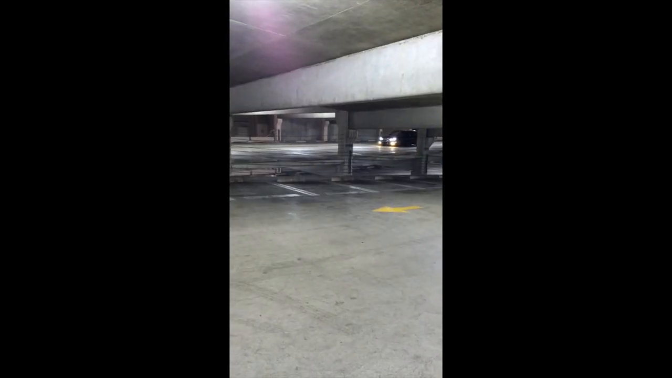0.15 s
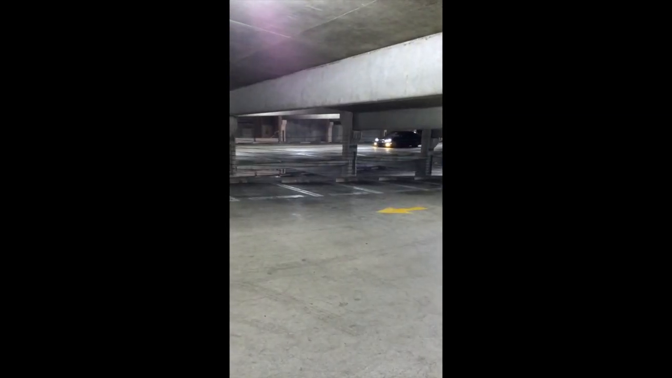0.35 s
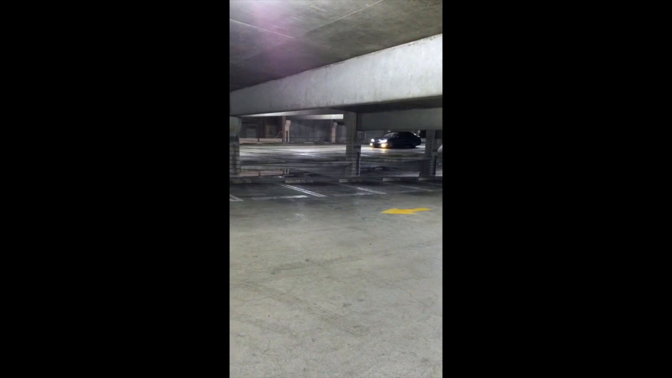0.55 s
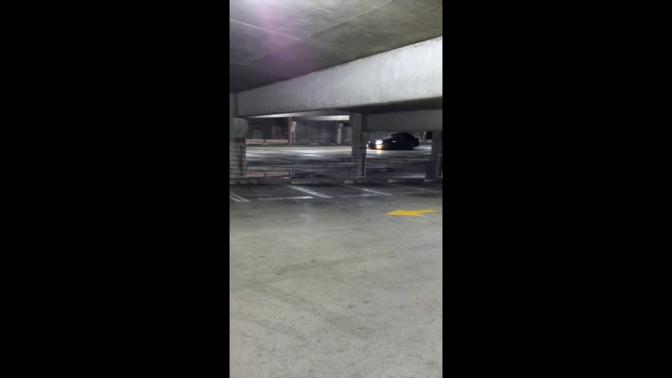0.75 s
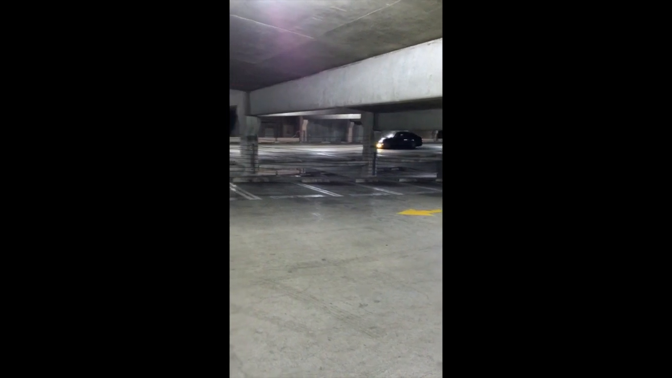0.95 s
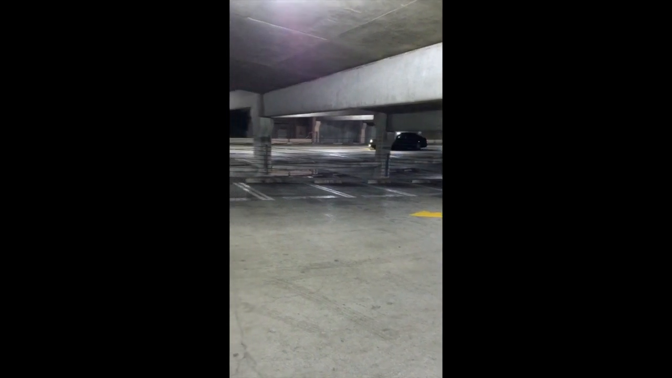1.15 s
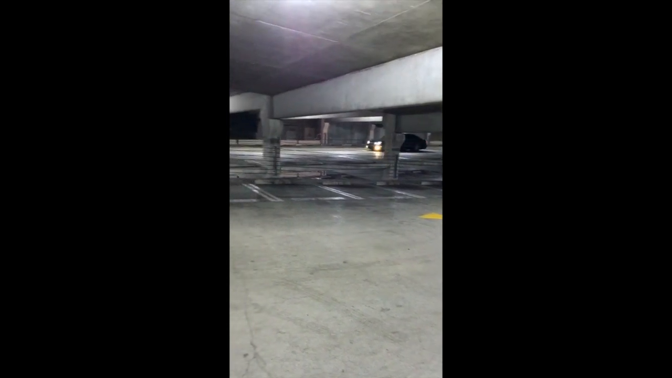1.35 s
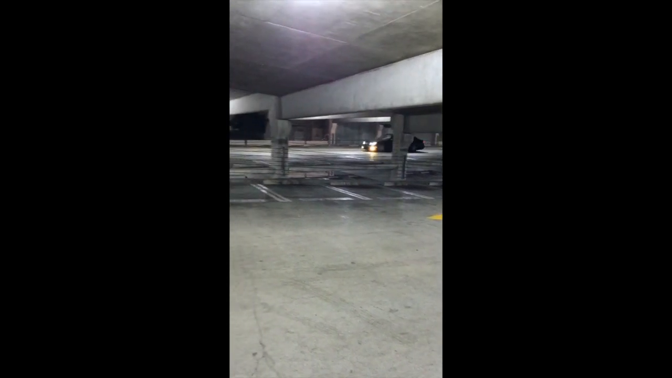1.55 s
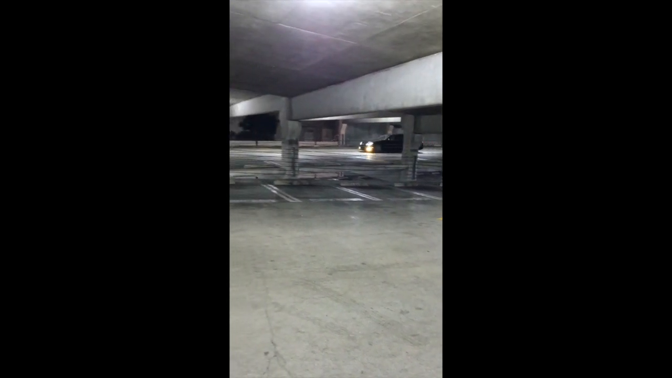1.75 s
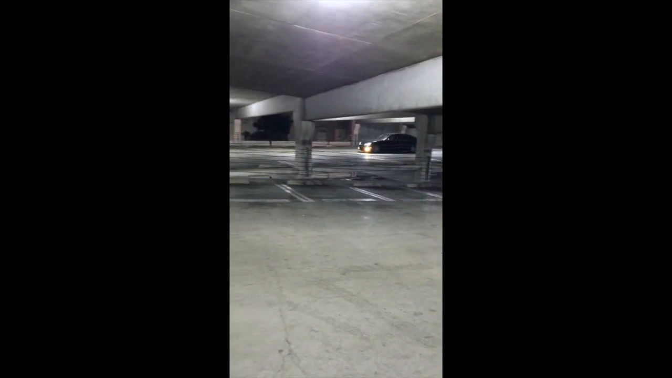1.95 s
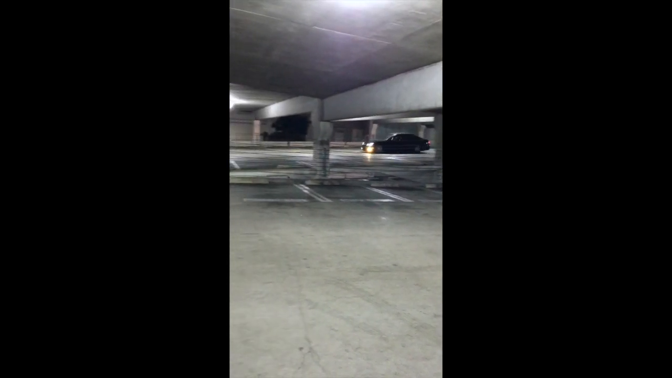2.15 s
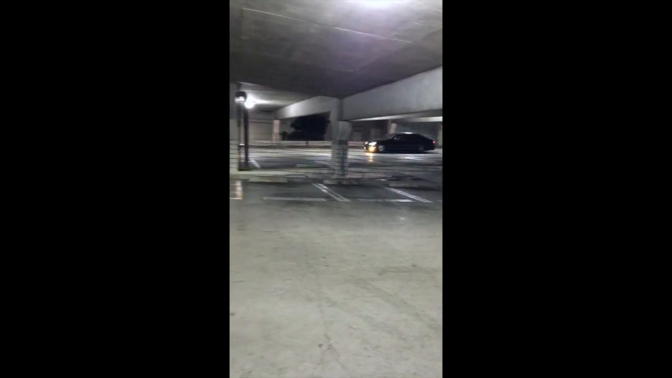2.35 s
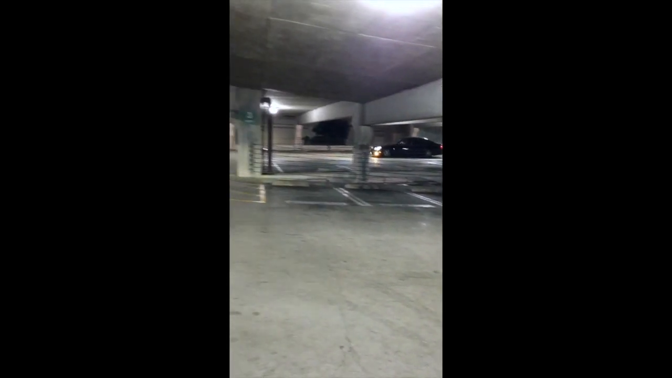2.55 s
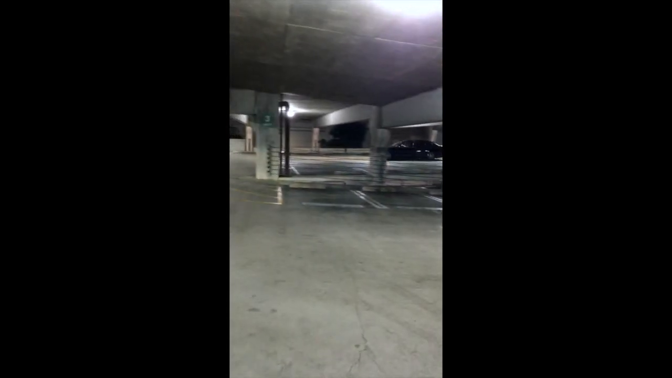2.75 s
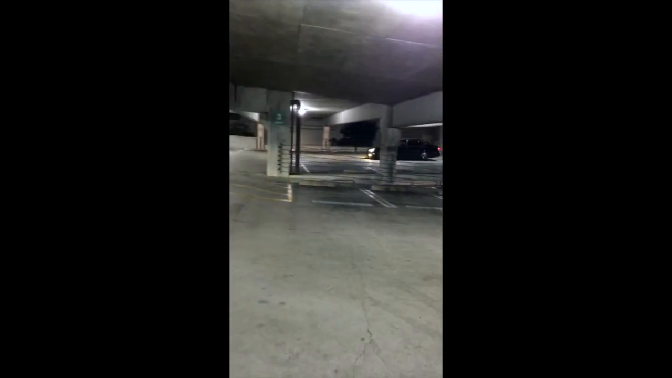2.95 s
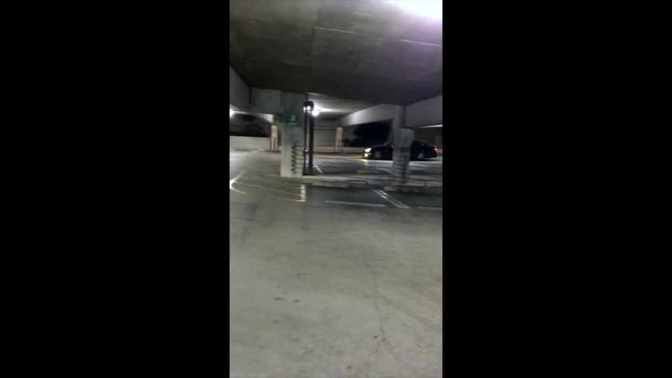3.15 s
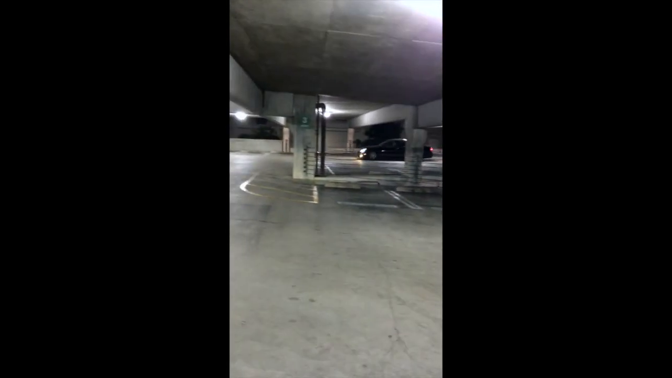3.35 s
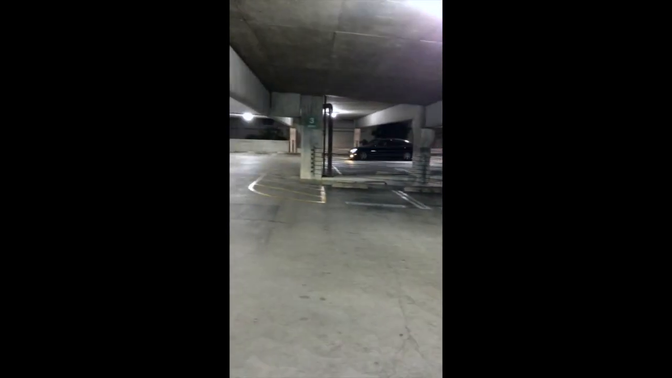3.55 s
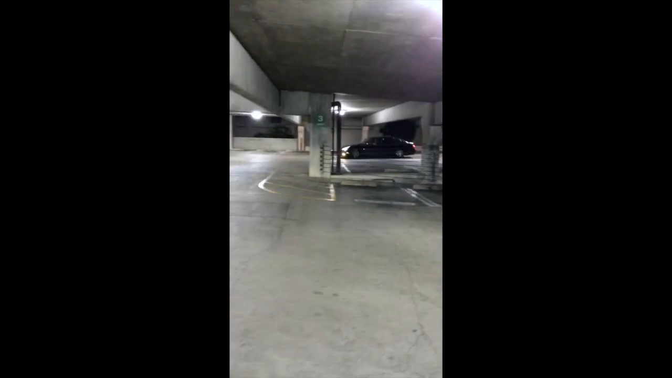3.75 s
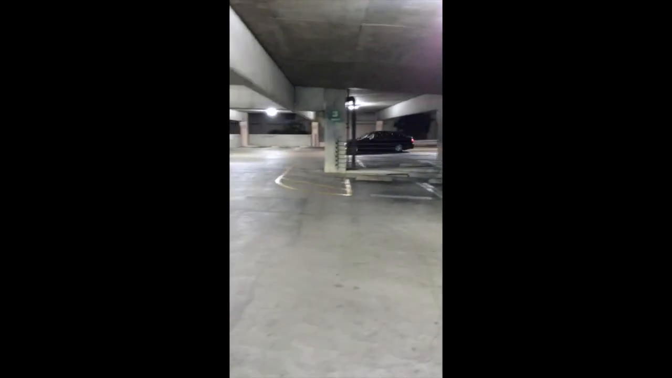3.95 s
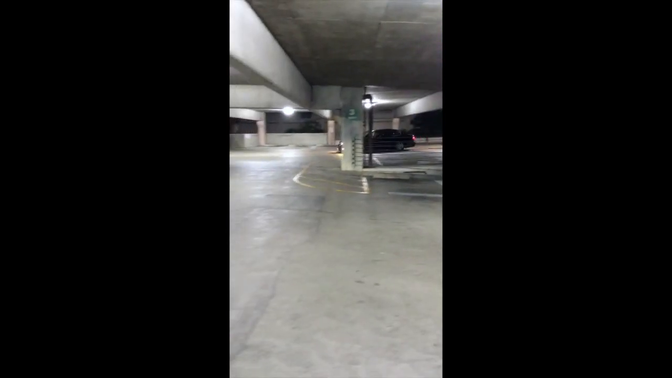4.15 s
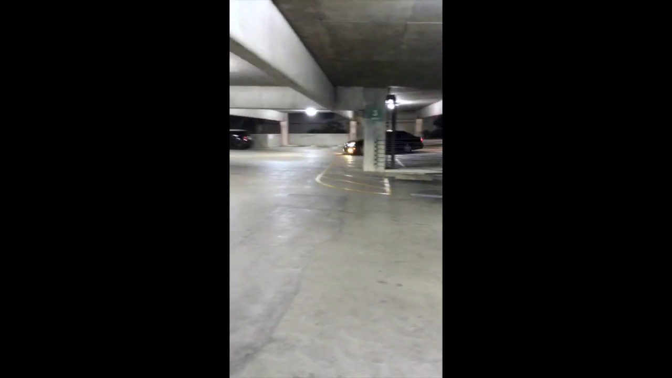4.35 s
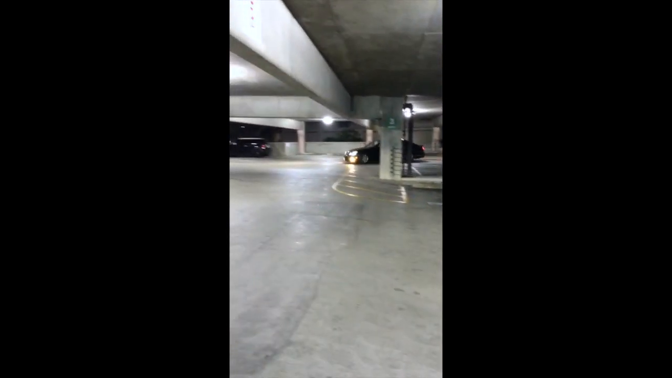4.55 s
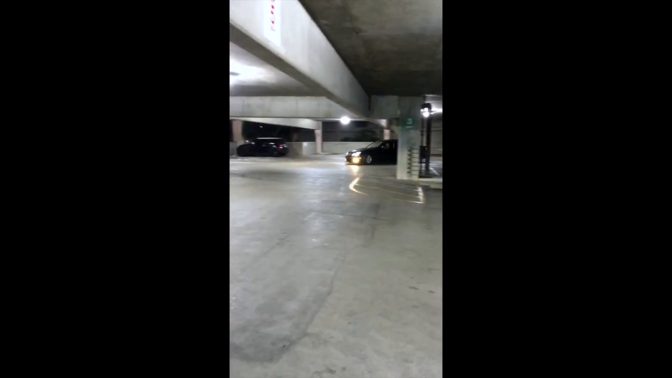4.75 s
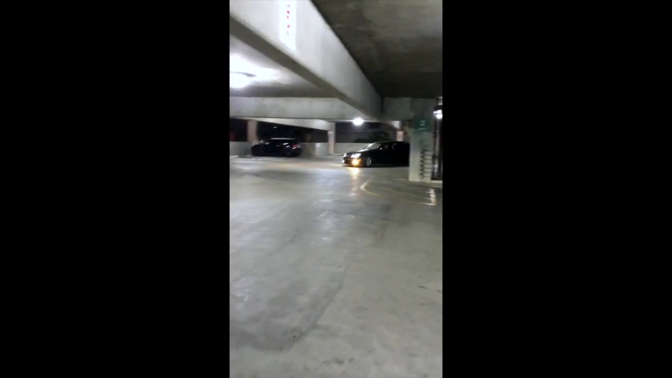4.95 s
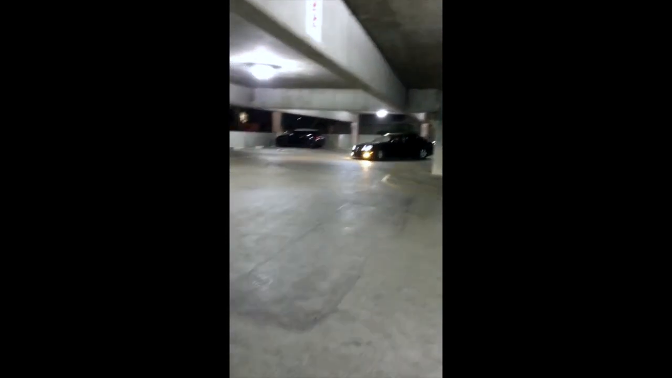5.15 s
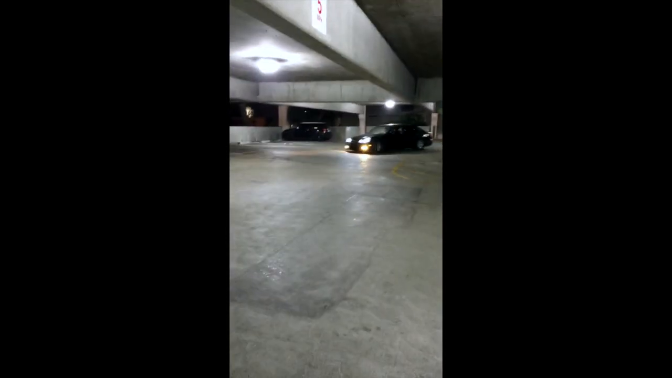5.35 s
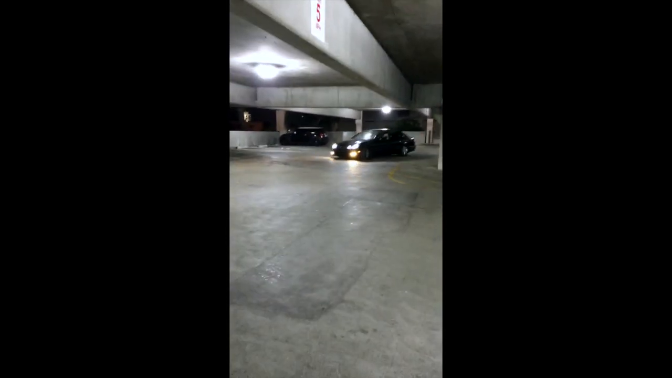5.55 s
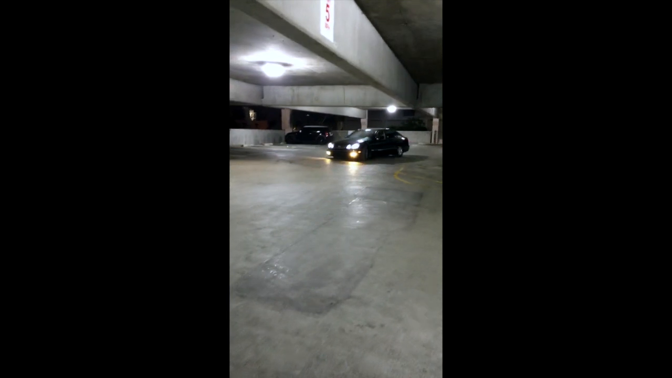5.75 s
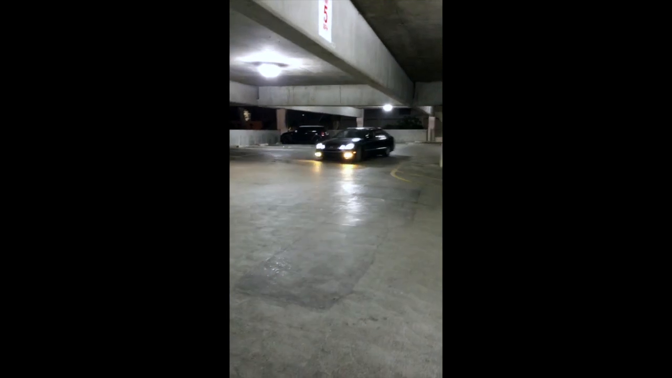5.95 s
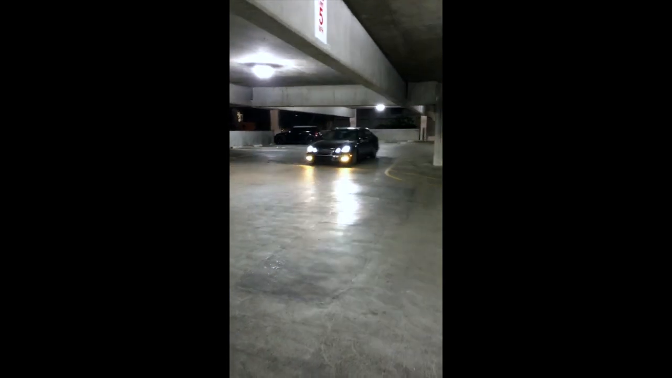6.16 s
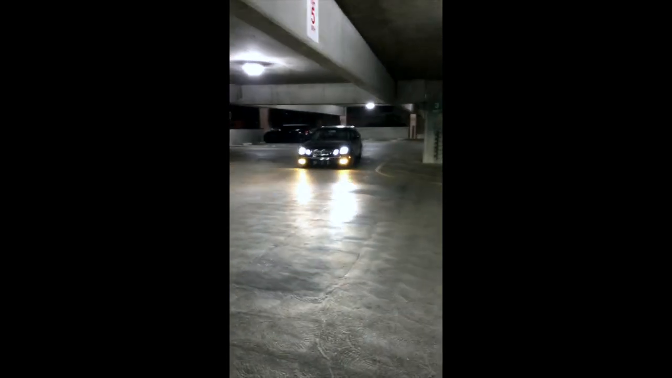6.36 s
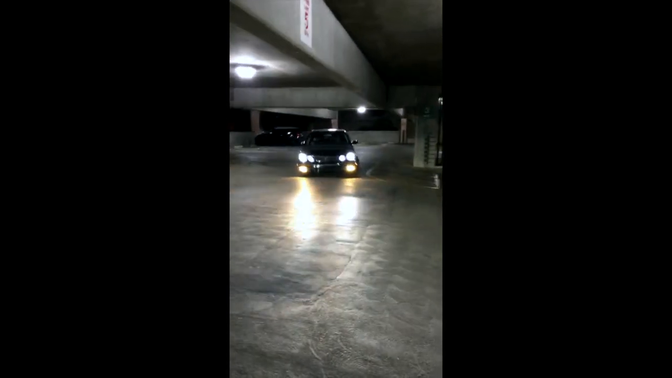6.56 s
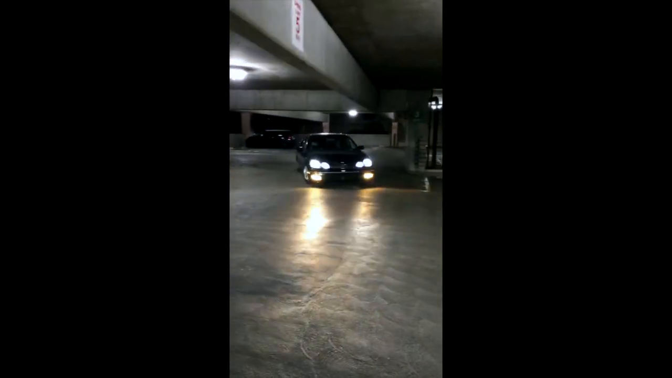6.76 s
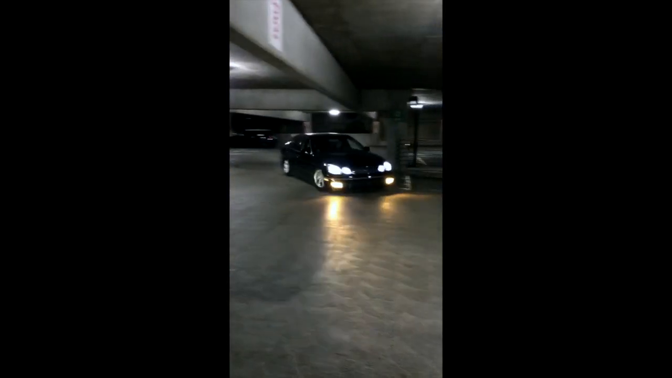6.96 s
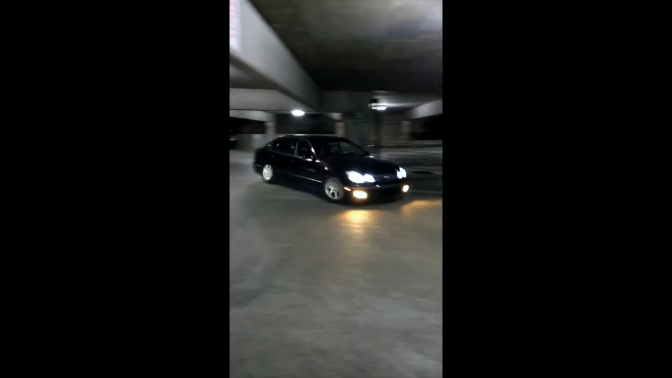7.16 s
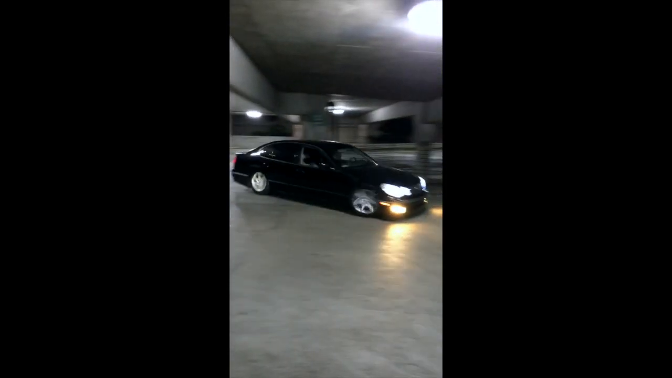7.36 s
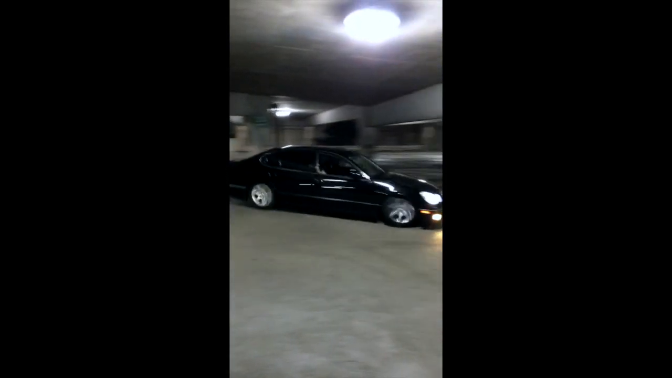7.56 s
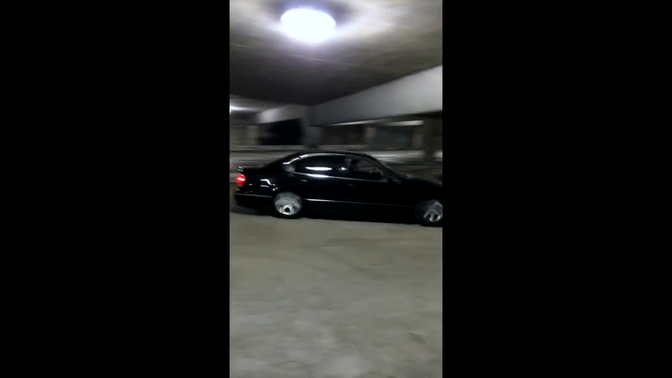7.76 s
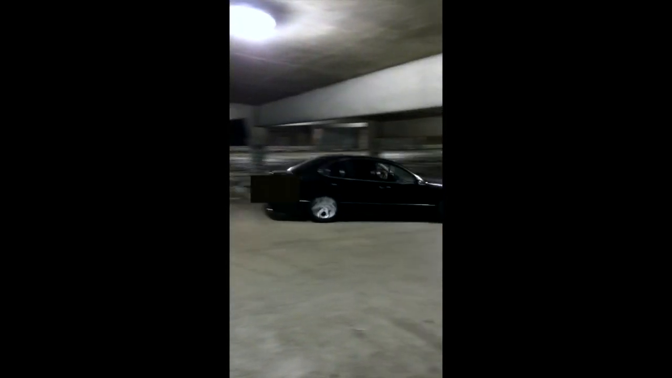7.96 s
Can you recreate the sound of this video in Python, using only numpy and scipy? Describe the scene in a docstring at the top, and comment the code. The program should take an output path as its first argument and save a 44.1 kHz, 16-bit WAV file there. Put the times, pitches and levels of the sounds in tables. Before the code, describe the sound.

In an echoing concrete parking garage, a car with an open eight-cylinder exhaust drones far off, giving a brief throbbing dab of throttle. It sinks to faint low chuffs under airy rush, tyre hiss and ventilation hum. Near six seconds the throttle opens, the drone swells and the car growls past the handheld microphone, rasping loudest after seven seconds.

```python
"""An eight-cylinder car with an open exhaust crawls on the far side of a concrete garage, then passes close by.
Tones locked to its firings make the drone, growl and a short throbbing dab of throttle. Pulses from uneven
cylinders make the burble, sharp fronts with puffs of noise make the bark, and short tones make the chuffs.
Shifting noise echoes stand for the garage. Shaped noise makes the rush of fan and tyres, faint whines,
tyre hiss and scuffs; a wavering sine makes the ventilation hum."""
import sys
import numpy as np
from scipy import signal
from scipy.fft import rfft, irfft, next_fast_len
from scipy.io import wavfile
from scipy.ndimage import uniform_filter1d

SR = 44100
rng = np.random.default_rng(int(sys.argv[2]) if len(sys.argv) > 2 else 0)


def master_out(mix):
    """Clip the mix to full scale and print it as 16-bit PCM to the path in sys.argv[1]."""
    frames = np.transpose(np.atleast_2d(mix))
    ceiling = np.clip(frames, -1, 1)
    pcm = np.round(ceiling * 32767).astype(np.int16)
    wavfile.write(sys.argv[1], SR, pcm)


N = 353348

# strength of each of the eight cylinders, in firing order: [strength_db]
CYLINDER_STRENGTHS = [2.5, 2, 3, 1.5, -2.5, 2, -1.5, -3.5]
# bark of the gas blasts; the growl follows it too: [time_s, level_db]
BARK_LEVEL = [(0, -47), (1.1, -63.5), (2, -46.5), (2.6, -56.5), (5.4, -63.5), (5.7, -49), (5.9, -34),
              (6.4, -39.5), (6.97, -37), (7.09, -25.5), (7.16, -28), (7.31, -20.5), (7.41, -20.5),
              (7.48, -21), (7.64, -22.5), (7.85, -27), (8, -29.5)]


def from_db(db):
    """Turn decibels into a factor for the waveform."""
    return np.exp(np.asarray(db) * (np.log(10) / 20))


def rms_one(x):
    """Scale a sound to an rms (average strength) of 1."""
    return x / np.sqrt(np.mean(x ** 2) + 1e-20)


def in_time(rows):
    """Read a curve of (time, value) rows at every sample, with straight lines between rows."""
    return np.interp(np.arange(N) / SR, *np.transpose(rows))


def colour(x, spectrum):
    """Filter by a spectrum that falls 20 dB per octave beyond its ends, then scale to rms 1."""
    hz, db = np.transpose(spectrum)
    size = next_fast_len(N + SR // 4)
    octave = np.log2(np.maximum(np.arange(size // 2 + 1) * SR / size, 1))
    outside = np.abs(octave - np.clip(octave, np.log2(hz[0]), np.log2(hz[-1])))
    gain = from_db(np.interp(octave, np.log2(hz), db) - 20 * outside)
    filtered = irfft(rfft(x, size) * gain, size)[:N]
    return rms_one(filtered)


def drift(rate_hz):
    """Random wandering of spread 1: noise smoothed twice, so that changes faster than the rate fade out."""
    step = 40  # samples between two drawn values
    r = np.exp(-2 * step * np.pi * rate_hz / SR)
    noise = rng.standard_normal(N // step + 2002)
    slow = signal.lfilter([1], [1, -2 * r, r * r], noise)[2000:]  # drop the filter's start-up
    return np.interp(np.arange(N) / step, np.arange(len(slow)), rms_one(slow))


def steady(x):
    """Even out slow swells by dividing by the smoothed strength; the fast throb stays."""
    power = uniform_filter1d(uniform_filter1d(x ** 2, size=SR // 6), size=SR // 10)
    return x / np.sqrt(np.maximum(power, 1e-12))


def swell(start_s, rise_s, hold_s, fall_db_per_s):
    """A loudness shape that rises until start_s, holds, then dies away."""
    since = np.arange(N) / SR - start_s
    rise = np.clip(1 + since / rise_s, 0, 1)
    return rise * from_db(-fall_db_per_s * np.maximum(since - hold_s, 0))


def throb(hz, depth_db, crest_s):
    """A regular swelling and fading with a crest at crest_s."""
    return from_db(depth_db * np.cos(2 * np.pi * hz * (np.arange(N) / SR - crest_s)))


def rings(x, table):
    """Narrow resonances, side by side, ring in answer to a sound."""
    return sum(from_db(db) * signal.lfilter(*signal.iirpeak(hz, hz / width, fs=SR), x)
               for hz, width, db in table)


def garage(x, direct_db, count=3):
    """Direct sound plus a dense fading echo, already ringing at the start, whose paths shift as the car moves."""
    garage_t60_s = 2.65  # time for a fall of 60 dB; the echo is cut off after 1 s
    t = np.arange(SR) / SR
    # the first second, played backwards, feeds the echo before the start
    running = np.concatenate([x[:len(t) - 1][::-1], x])
    shares = np.array([drift(1.25) for path in range(count)])
    out = from_db(direct_db) * x
    for share in shares / np.linalg.norm(shares, axis=0):
        echo = rng.standard_normal(len(t)) * from_db(-60 * t / garage_t60_s)
        out = out + share * signal.fftconvolve(running, echo / np.linalg.norm(echo), "valid")
    return out


def early_echo(x, count=2):
    """Floor, ceiling and nearest beams smear the pulses but keep their pitch; the paths shift quickly."""
    early_t60_s = 0.11
    t = np.arange(SR // 4) / SR
    shares = np.array([drift(3) for path in range(count)])
    shares = shares / np.linalg.norm(shares, axis=0)
    echoes = rng.standard_normal((count, len(t))) * from_db(-60 * t / early_t60_s)
    return sum(share * signal.fftconvolve(x, echo)[:N] for share, echo in zip(shares, echoes))


def closeness():
    """Share of the bark's power that comes ahead of the long echo; it peaks as the car passes."""
    pass_s, pass_half_s, peak_share = 7.4, 0.67, 0.67
    away = (np.arange(N) / SR - pass_s) / pass_half_s
    return peak_share / (1 + away ** 2)


def standing_waves(hz):
    """Strength and phase of a tone that meets its own late reflections; mean power about 1."""
    # walls and beams throw the drone back; the detour changes as the car moves:
    # [start_s, end_s, first_detour_m, detour_growth_m_per_s, strength_0_to_1]
    reflections = [(5.7, 8.1, 36.14, -6, 0.7), (5.7, 8.1, 20, -4, 0.42), (5.7, 8.1, 25.63, -6.5, 0.48),
                   (5.7, 6.6, 12.3, 7, 0.55)]
    fade_s, sound_m_per_s = 0.11, 343
    t, hz = np.arange(0, N, 50) / SR, hz[::50]  # every 50th sample is enough
    wave, power = 1, 1
    for start, end, detour, growth, strength in reflections:
        heard = strength * np.clip(1 + np.minimum(t - start, end - t) / fade_s, 0, 1)
        late_s = (detour + growth * (t - start)) / sound_m_per_s
        wave = wave + heard * np.exp(-2j * np.pi * hz * late_s)
        power = power + heard ** 2
    wave = wave / np.sqrt(power)
    return np.interp(np.arange(N) / SR, t, wave)


def pipe(x):
    """Waves bounce inverted off the pipe's open end and build up resonances; the treble escapes instead."""
    # lowest (quarter-wave) resonance; the others lie at its odd multiples
    pipe_hz, bounce, loss_hz = 51.65, 0.33, 2200
    size = next_fast_len(N + SR // 4)
    hz = np.arange(size // 2 + 1) * SR / size
    echo = bounce * np.exp(-(hz / loss_hz) ** 2)
    resonance = 1 / (1 + echo * np.exp(-1j * np.pi * hz / pipe_hz))
    return irfft(rfft(x, size) * resonance, size)[:N]


def firings(turns, scatter, jitter_s):
    """One pulse per firing: the cylinders differ, and no two burns are alike in strength or timing."""
    at = np.flatnonzero(np.diff(np.floor(turns)) > 0)  # turns counts firings
    chance = rng.standard_normal(size=(1000, 2))[:len(at)]
    pattern = from_db(CYLINDER_STRENGTHS)[np.arange(len(at)) % len(CYLINDER_STRENGTHS)]
    late = np.round(jitter_s * SR * chance[:, 1]).astype(int)
    return np.clip(at + late, 0, N - 1), pattern * (1 + scatter * chance[:, 0])


def engine_line(turns, multiple, scattered, swells=1):
    """A tone locked to the engine, rms about 1; a share of it comes by shifting paths and beats with the rest."""
    share = np.clip(scattered, 0, 1)
    shifting = np.sqrt(share / 2) * (drift(7.7) + 1j * drift(7.4))
    paths = np.sqrt(1 - share) * swells + shifting
    return np.sqrt(2) * np.real(paths * np.exp(2j * np.pi * (multiple * turns + rng.random())))


def ventilation():
    """A low hum fills the deck: a sine whose pitch and level waver slightly."""
    # ventilation hum before its random waver: [time_s, level_db]
    hum_level = [(0, -65), (1, -63), (3, -57), (4.5, -58), (5.2, -55), (8, -54)]
    hum_hz = 80.7
    phase = 2 * np.pi * hum_hz * np.arange(N) / SR + .5 * drift(0.74)
    return np.sqrt(2) * from_db(in_time(hum_level) + drift(1.2)) * np.sin(phase)


def rolling(flutter_db):
    """Fan and tyre noise sweeps against its wall echoes, with faint whines; the tread adds a slightly grainy hiss."""
    # rush of fan and tyres before its random waver: [time_s, level_db]
    rush_level = [(0, -43.5), (.7, -46), (1.25, -42), (2.2, -43.5), (2.7, -41), (5.4, -41), (6.5, -37),
                  (8, -37.5)]
    # tone of the rush: [frequency_hz, relative_level_db]
    rush_colour = [(250, -5), (450, 0), (590, -3), (760, -1.5), (920, 2.5), (1080, -1), (1330, -3),
                   (1650, -3), (1950, -6.5), (2400, -15), (2950, -12.5), (3350, -13), (3650, -21),
                   (4200, -22), (4900, -20.5), (5350, -24), (5800, -31), (9000, -36.5)]
    # walls that throw the rush back: [detour_m, detour_sway_m, strength_0_to_1]
    rush_walls = [(2.3, .1, 0.26), (4.7, .14, 0.28), (8.1, .18, 0.23), (12.6, .2, 0.27)]
    # whines of belt and fan: [pitch_hz, width_hz, relative_level_db]
    whine_rings = [(890, 16, 10), (3380, 35, 3), (4016, 46, -0.5), (5080, 55, -3.5), (6780, 60, -4.5),
                   (7330, 60, -6.5), (7870, 54, -9.5)]
    # tyres hissing on smooth concrete: [time_s, level_db]
    hiss_level = [(0, -59), (.45, -63), (1.55, -57.5), (2.25, -59.5), (3.4, -56), (4.2, -54.5),
                  (5.8, -54.5), (6.6, -56), (7.1, -53), (7.9, -61)]
    # tone of the hiss: [frequency_hz, relative_level_db]
    hiss_colour = [(1500, -1.5), (3200, 9.5), (4000, 4), (5000, 4.5), (6000, 1), (7500, 0), (9000, -5),
                   (11300, -4), (12000, -7), (12800, -3.5), (14000, -12), (15200, -26)]
    waver_db, whine_db, sound_m_per_s = 0.49, -64, 343
    n = np.arange(N)
    air = colour(rng.standard_normal(N), rush_colour)
    walls = 0
    for detour, sway, strength in rush_walls:
        late_samples = (detour + sway * drift(0.501)) / sound_m_per_s * SR
        walls = walls + strength * np.interp(n - late_samples, n, air)
    rush = from_db(in_time(rush_level) + waver_db * drift(4)) * rms_one(air + walls)
    whine = from_db(whine_db) * rms_one(rings(rng.standard_normal(N), whine_rings))
    grains = rng.standard_normal(N) * from_db(flutter_db * drift(60))
    return rush + whine + from_db(in_time(hiss_level)) * colour(grains, hiss_colour)


def scuffs(grain_db):
    """The tread slips on the concrete in the turns: short, bright, uneven hisses of noise."""
    # single scuffs; each is fully risen at peak_s: [peak_s, rise_s, hold_s, level_db]
    scuff_list = [(3.782, .025, .015, -48.5), (3.852, .02, .02, -46), (5.81, 0.32, 0.16, -51),
                  (7.06, .15, .03, -49.5), (7.13, .04, 0.047, -52)]
    # tone of the scuffs: [frequency_hz, relative_level_db]
    scuff_colour = [(1800, -5.5), (3200, 11), (4200, 6.5), (6000, 3), (7500, -1), (9000, -3.5),
                    (12000, -6.5), (14000, -11), (15200, -21)]
    fall_db_per_s = 82.5
    power = sum((from_db(db) * swell(s, rise, hold, fall_db_per_s)) ** 2
                for s, rise, hold, db in scuff_list)
    grains = rng.standard_normal(N) * from_db(grain_db * drift(70))
    return np.sqrt(power) * colour(grains, scuff_colour)


def chuffs():
    """Each hard burn is a short low thud with one overtone, and the garage answers it."""
    # single hard burns, each fully risen at peak_s; level of the lower tone: [peak_s, pitch_hz, level_db]
    chuff_list = [(2.391, 120, -32), (2.531, 191.3, -25), (2.67, 199, -35), (2.73, 185, -31),
                  (2.88, 193, -34), (3.061, 198, -32), (3.15, 202, -32), (3.26, 183, -34), (3.48, 137, -37),
                  (3.67, 160, -36), (3.779, 167.6, -36), (3.95, 223, -40), (4, 213, -39.5),
                  (4.38, 251, -41.5), (4.61, 199.6, -38), (4.76, 212, -38), (5.03, 210, -38),
                  (5.149, 230, -41), (5.23, 215, -37.5), (5.285, 160, -35), (5.54, 163, -29),
                  (5.6, 165, -36), (5.68, 187, -28), (5.861, 104, -31), (6.359, 300, -22)]
    rise_s, hold_s, fall_db_per_s = 0.00775, 0.0059, 334
    overtone_db, echo_db = -10, -8
    t, out = np.arange(SR // 4) / SR, np.zeros(N + SR)
    fall = from_db(-fall_db_per_s * np.maximum(t - rise_s - hold_s, 0))
    envelope = np.minimum(t / rise_s, 1) * fall
    for s, hz, db in chuff_list:
        phase = 2 * np.pi * (hz * t + rng.random())
        start = int((s - rise_s) * SR)
        thud = np.sin(phase) + from_db(overtone_db) * np.sin(1.6 * phase)
        out[start:start + len(t)] += from_db(db) * np.sqrt(2) * envelope * thud
    return out[:N] + from_db(echo_db) * garage(out[:N], direct_db=-26, count=1)


def throttle_dab(turns):
    """A short push on the pedal, far off, makes the uneven cylinders lope: throbbing tones that die away."""
    # lines that it stresses: [multiple_of_engine_cycle, relative_level_db]
    dab_lines = [(22, 0.5), (24, -6), (32, -11.5), (40, -11.5), (48, -21.5)]
    peak_s, rise_s, hold_s, fall_db_per_s, level_db = 1.88, 0.15, 0.3, 35, -30
    throb_hz, throb_db = 4.73, 6
    # one engine cycle is eight firings
    lines = sum(from_db(db) * engine_line(turns, np.round(k) / len(CYLINDER_STRENGTHS), scattered=0.39)
                for k, db in dab_lines)
    shape = swell(peak_s, rise_s, hold_s, fall_db_per_s) * throb(throb_hz, throb_db, peak_s)
    return from_db(level_db) * shape * lines


def growl(turns):
    """Strong and weak firings alternate under load: beating lines between the harmonics grow with the bark."""
    # growling lines: [multiple_of_firing_rate, relative_level_db]
    growl_lines = [(1.5, -4), (2.5, -0.5), (3.5, 3), (4.5, -1.5), (5.5, -9.5), (6.5, -6.5)]
    offset_db, follows = -17, 0.63  # follows: dB of growl per dB of bark
    halves = sum(from_db(db) * engine_line(turns, np.round(2 * k) / 2, scattered=.15)
                 for k, db in growl_lines)
    return from_db(offset_db + follows * in_time(BARK_LEVEL)) * halves


def burble(turns):
    """The unevenness of the cylinders throbs in the garage, between the harmonics."""
    # burble before nearness and flutter change it: [time_s, level_db]
    burble_level = [(0, -34), (.5, -31.5), (1, -30.5), (1.4, -34.5), (1.65, -29.5), (1.95, -29.5),
                    (2.3, -30.5), (2.8, -35.5), (4.2, -42.5), (4.7, -43.5), (5.45, -40), (5.63, -39),
                    (5.73, -26), (5.87, -24.5), (6.15, -24.5), (6.4, -25.5), (6.7, -28), (7.1, -22),
                    (7.3, -24), (8, -23)]
    # how directly the tailpipe is heard: [time_s, share_0_to_1]
    nearness = [(0, 0.83), (.9, 0.04), (2.2, 0.01), (5.5, 0), (5.9, 0.03), (6.3, 0.75), (8, 1)]
    # tone of the burble from afar: [frequency_hz, relative_level_db]
    far_boom = [(35, -38), (60, -33.5), (90, -28), (105, -11), (122, -7), (160, -1.5), (210, 0.5),
                (255, -7.5), (300, -5), (345, -17), (380, -11.5), (450, -15.5), (550, -35.5), (900, -50.5)]
    # tone of the burble close by: [frequency_hz, relative_level_db]
    near_boom = [(30, -47.5), (50, -37.5), (75, -25.5), (125, -28), (160, -16.5), (210, -14), (240, -3.5),
                 (285, 3), (350, -2.5), (460, -2.5), (560, -8.5), (800, -12)]
    flutter_hz, flutter_db = 24.34, 2
    at, strength = firings(turns, scatter=.13, jitter_s=.0001)
    pulses = np.zeros(N)
    pulses[at] = strength - strength.mean()  # only the unevenness is left
    echoing = garage(pulses, direct_db=-7)
    # from afar only the boom carries; close by the pipe's own resonances come through
    near = np.clip(in_time(nearness), 0, 1)
    far_part = np.sqrt(1 - near) * colour(echoing, far_boom)
    near_part = np.sqrt(near) * colour(pipe(echoing), near_boom)
    # the flutter fades as the tailpipe comes near
    wave = np.cos(2 * np.pi * flutter_hz * np.arange(N) / SR + drift(1.4))
    flutter = flutter_db * (1 - near) * wave
    return from_db(in_time(burble_level) - 1.0 * near + flutter) * steady(far_part + near_part)


def bark(turns, puff_decay):
    """Each firing is a sharp front and a puff of gas: a ringing echo from afar, a pitched rasp close by."""
    # turbulent gas against the sharp fronts: [time_s, relative_level_db]
    gas_level = [(0, -1), (5.8, -4.5), (6.9, -3), (7.3, -4), (8, -6)]
    # ringing of the deck under the bark: [pitch_hz, width_hz, gain_db]
    deck_rings = [(449, 14, 4.5), (518, 14, 1), (671, 14, 4.5), (830, 20, -1.5), (1070, 14, -5.5)]
    # tone of the bark: [frequency_hz, relative_level_db]
    bark_colour = [(330, -22.5), (450, -9.5), (560, 0), (680, 2), (780, 0.5), (900, 3), (1100, 1.5),
                   (1350, -1.5), (1550, -12.5), (1900, -11), (2400, -21), (3200, -22.5), (4200, -31),
                   (5500, -39), (9000, -62.5)]
    at, strength = firings(turns, scatter=0.09, jitter_s=.00014)
    fronts = np.zeros(N)
    fronts[at] = strength
    puffs = rng.standard_normal(N) * np.exp(-puff_decay * (turns % 1))  # each dies away until the next
    blasts = pipe(rms_one(fronts) + from_db(in_time(gas_level)) * rms_one(puffs))
    echo, close = garage(blasts, direct_db=-13), closeness()
    far_part = np.sqrt(1 - close) * rms_one(echo + rings(echo, deck_rings))
    # close by, a second pass makes the pipe's resonances stand out more sharply
    near_part = np.sqrt(close) * rms_one(early_echo(pipe(blasts)))
    return from_db(in_time(BARK_LEVEL)) * steady(colour(far_part + near_part, bark_colour))


def drone(turns, speed, count=6):
    """Harmonics of the firing rate, brighter under load and lifted by booms; higher ones scatter more."""
    # drone before tone, load and swells change it: [time_s, level_db]
    drone_level = [(0, -29.5), (.5, -31.5), (1.1, -34.5), (1.52, -36), (1.8, -35.5), (4.3, -50), (5.5, -45),
                   (5.74, -32.5), (5.95, -32.5), (6.17, -36), (6.36, -25), (6.6, -22.5), (6.87, -24.5),
                   (7.05, -29), (7.3, -24), (7.78, -23.5), (8, -23.5)]
    # how exhaust and deck favour a harmonic at light throttle: [frequency_hz, gain_db]
    tone_colour = [(78, -34), (86, -27), (100, -10.5), (156, -2), (172, 0.5), (205, -1.5), (232, -3),
                   (255, -12), (280, -4.5), (310, -5), (345, -18), (400, -16), (470, -21.5), (600, -33.5)]
    # the deck booms where one harmonic resonates: [centre_s, multiple_of_firing_rate, half_length_s, level_db]
    boom_list = [(0.008, 2, 0.051, -17.5), (0.125, 3, 0.051, -25.5), (0.166, 2, 0.024, -20),
                 (0.198, 4, 0.07, -22), (0.268, 2, 0.072, -17), (.39, 4, 0.092, -28.5),
                 (0.414, 3, 0.074, -31), (0.454, 2, 0.053, -21.5), (0.608, 3, 0.043, -22.5),
                 (.63, 2, 0.045, -25.5), (0.813, 2, 0.049, -16.5), (0.968, 3, 0.031, -27),
                 (1.136, 3, 0.091, -30), (1.272, 4, 0.037, -25), (1.53, 2, 0.15, -27.5),
                 (1.732, 5, 0.065, -38.5), (1.802, 2, 0.056, -30.5), (1.934, 4, 0.06, -37),
                 (2.08, 5, 0.091, -28.5), (2.236, 4, 0.06, -29), (4.375, 4, 0.07, -40),
                 (5.72, 2, 0.037, -26.5), (5.87, 5, 0.11, -30.5), (5.89, 3, 0.09, -26),
                 (5.967, 4, .03, -26), (6.04, 4, 0.035, -22.5), (6.046, 2, 0.045, -17.5),
                 (6.252, 2, 0.03, -20.5), (6.518, 4, 0.14, -26.5), (6.414, 3, 0.077, -32),
                 (6.654, 3, 0.07, -30), (6.844, 2, 0.039, -19.5), (6.91, 3, 0.028, -22),
                 (6.882, 6, 0.15, -31), (7.048, 3, 0.048, -16.5), (7.215, 2, 0.026, -18.5),
                 (7.226, 3, 0.021, -14.5), (7.25, 1, .05, -29.5), (7.35, 3, 0.044, -18),
                 (7.5, 3, 0.045, -20.5), (7.554, 4, 0.41, -27), (7.618, 2, 0.047, -20), (7.62, 5, .05, -26),
                 (7.8, 1, 0.064, -27), (7.954, 3, 0.072, -18.5)]
    # the throttle opens for the approach and lifts the harmonics above a shelf
    pull_away_s, throttle_rise_s = 5.65, 0.31
    lift_db, shelf_hz, shelf_width_hz = 7, 240, 51
    load = swell(pull_away_s + throttle_rise_s, throttle_rise_s, 0, 0)
    t, level_db, out = np.arange(N) / SR, in_time(drone_level), 0
    for k in range(1, count + 1):
        hz = k * speed
        above_shelf = np.clip((hz - shelf_hz) / shelf_width_hz, 0, 1)
        colour_db = np.interp(hz, *np.transpose(tone_colour)) + lift_db * load * above_shelf
        # the lowest harmonic throbs slowly; the others swell and fade with the reflections
        swells = throb(3, 5, 5.6) if k == 1 else standing_waves(hz)
        booms = sum(from_db(db) * np.exp(-np.minimum(np.abs(t - s) / half, 10) ** 2)
                    for s, multiple, half, db in boom_list if round(multiple) == k)
        strength = np.hypot(from_db(level_db + colour_db) * np.abs(swells), booms)
        scattered = 0.095 + (k / 5.6) ** 3
        phase_only = np.exp(1j * np.angle(swells))
        out = out + strength * engine_line(turns, k, scattered, phase_only)
    return out


def scene():
    """The exhaust, driven by the engine speed, sounds over rolling noise, scuffs and hum."""
    # engine speed before it hunts: [time_s, firings_per_s]
    engine_speed = [(0, 79), (.5, 76.7), (1.35, 76.2), (1.75, 74.5), (2, 75.5), (2.35, 74.5), (3, 73.6),
                    (4, 72), (5, 78), (5.7, 74.3), (6, 78), (6.25, 81), (6.55, 84.3), (6.87, 85.8),
                    (6.97, 87.5), (7.03, 92.8), (7.09, 92.5), (7.16, 101), (7.3, 105), (7.42, 102),
                    (7.58, 103), (7.85, 100), (8.01, 98)]
    hunt_spread, hunt_rate_hz = .35, 6  # spread in firings per s
    smooth_speed = in_time(engine_speed)
    speed = smooth_speed + hunt_spread * drift(hunt_rate_hz)
    turns = np.cumsum(speed) / SR  # firings so far
    tones = drone(turns, smooth_speed) + growl(turns) + throttle_dab(turns)
    exhaust = tones + burble(turns) + chuffs() + bark(turns, puff_decay=2.3)
    background = rolling(flutter_db=0.8) + scuffs(grain_db=1.6) + ventilation()
    return (exhaust + background)[None]


def record(dry):
    """The sound eases in and the top is cut steeply."""
    ease_in_s, cutoff_hz = .006, 15200
    eased = dry * swell(ease_in_s, ease_in_s, 0, 0)
    steep = signal.ellip(10, .1, 80, cutoff_hz, fs=SR, output="sos")
    return signal.sosfilt(steep, eased)


dry = scene()
out = record(dry)
master_out(out)
```